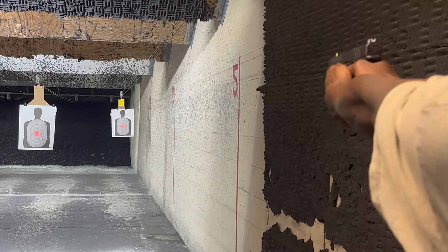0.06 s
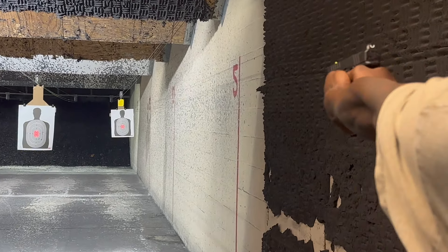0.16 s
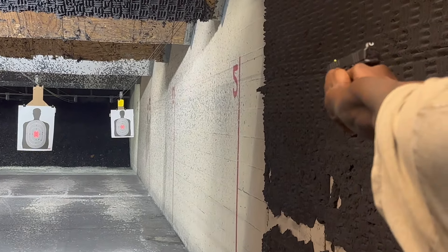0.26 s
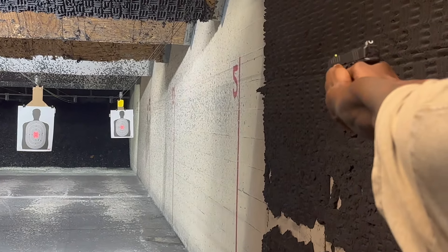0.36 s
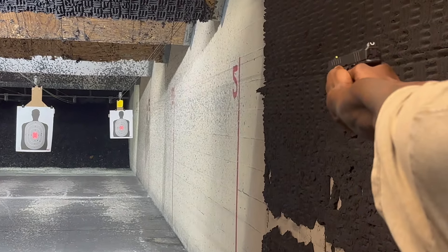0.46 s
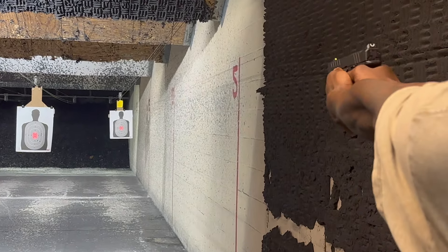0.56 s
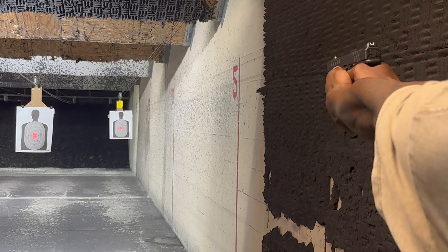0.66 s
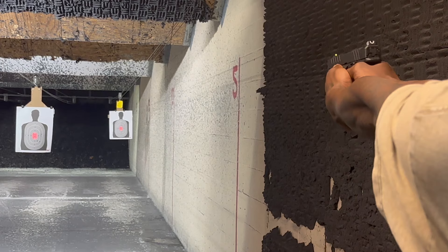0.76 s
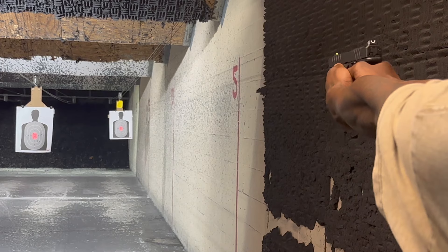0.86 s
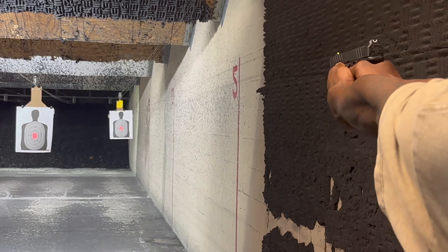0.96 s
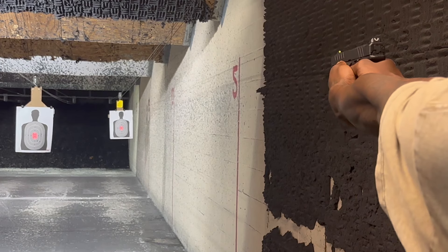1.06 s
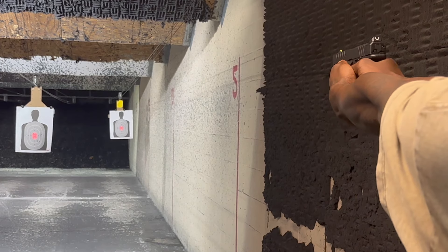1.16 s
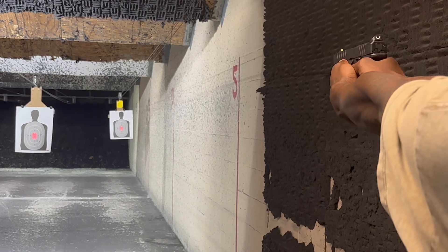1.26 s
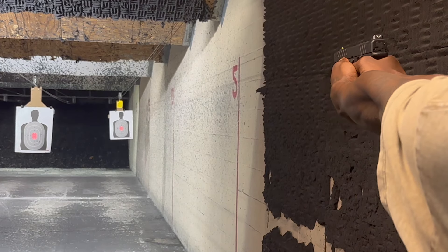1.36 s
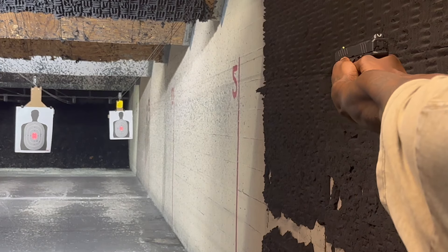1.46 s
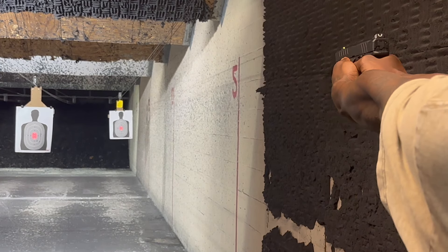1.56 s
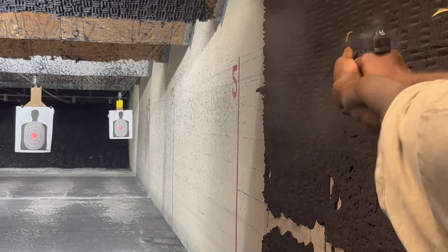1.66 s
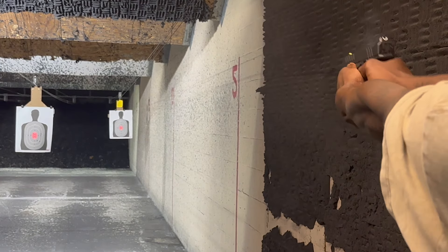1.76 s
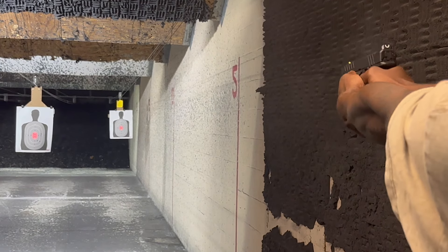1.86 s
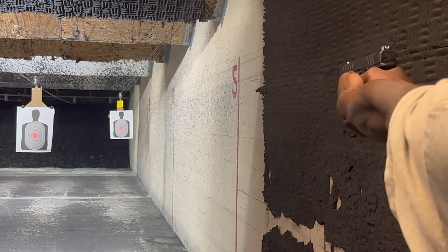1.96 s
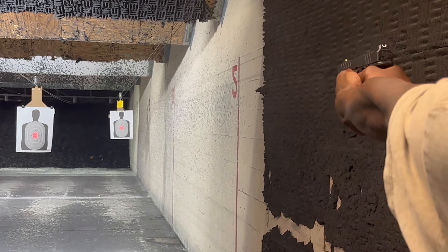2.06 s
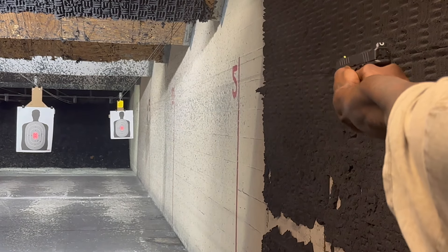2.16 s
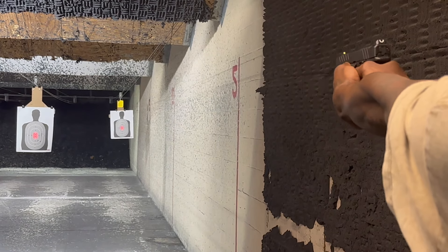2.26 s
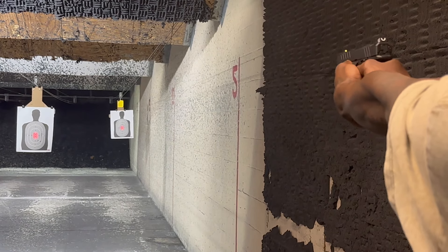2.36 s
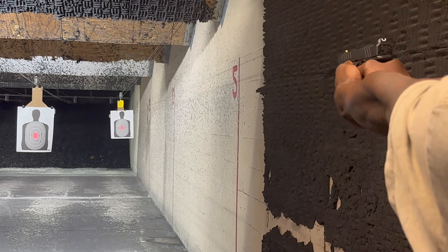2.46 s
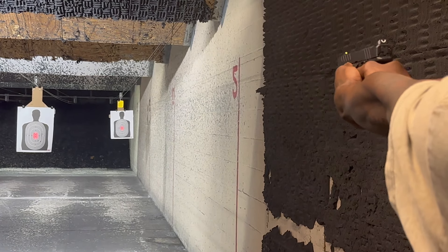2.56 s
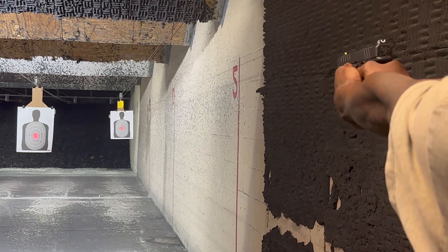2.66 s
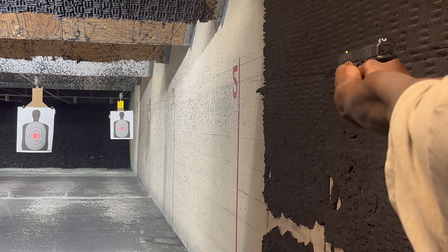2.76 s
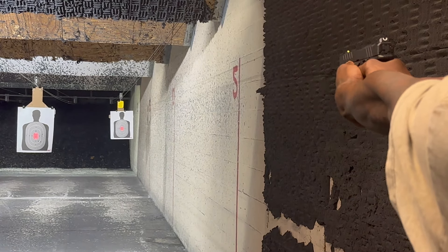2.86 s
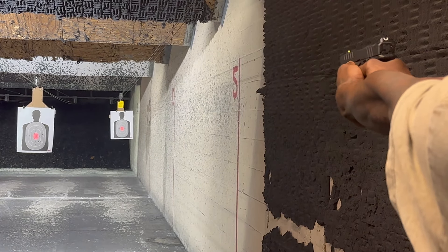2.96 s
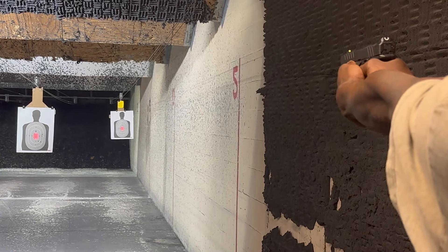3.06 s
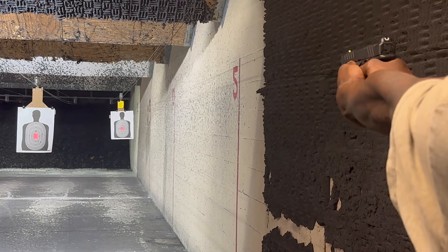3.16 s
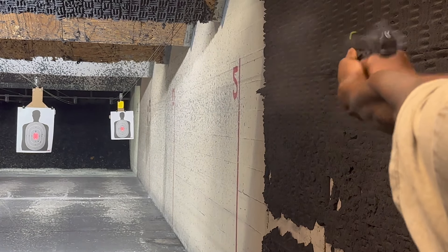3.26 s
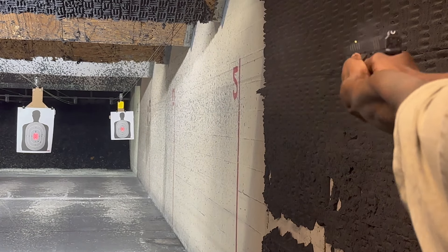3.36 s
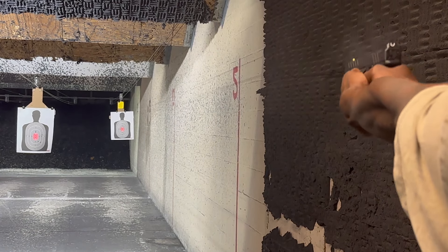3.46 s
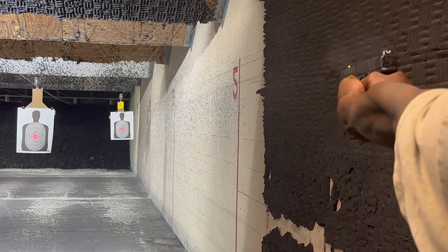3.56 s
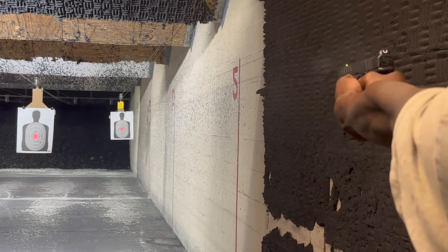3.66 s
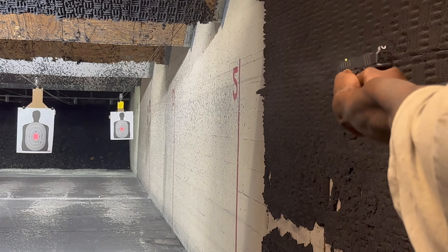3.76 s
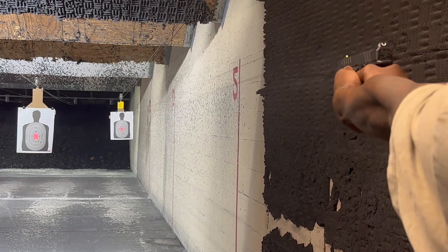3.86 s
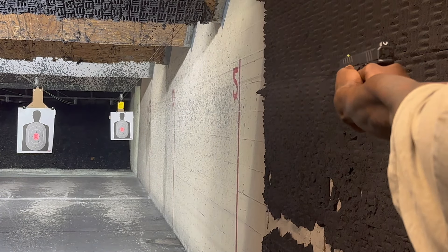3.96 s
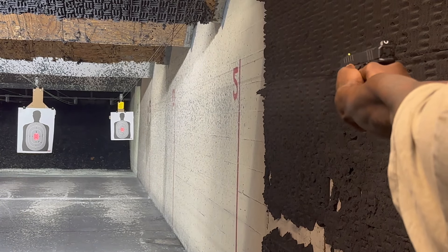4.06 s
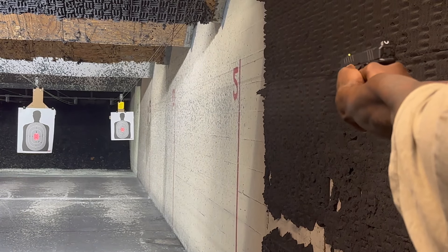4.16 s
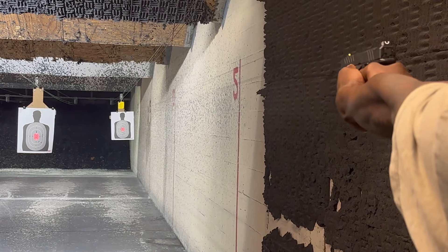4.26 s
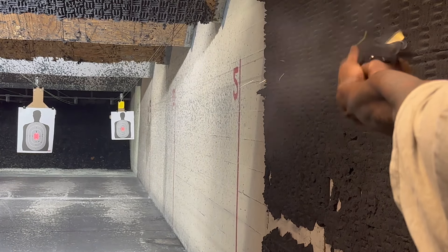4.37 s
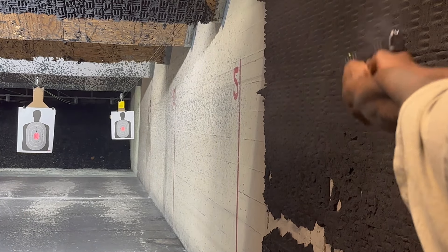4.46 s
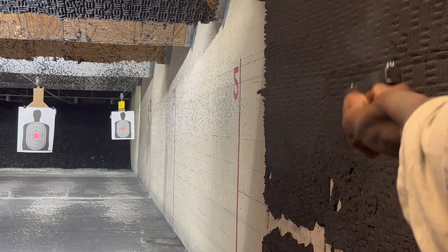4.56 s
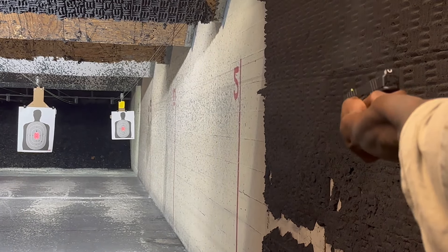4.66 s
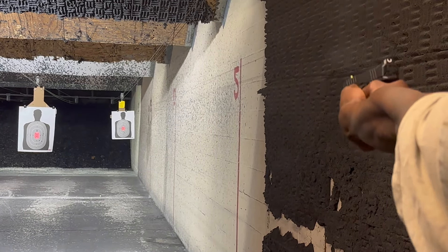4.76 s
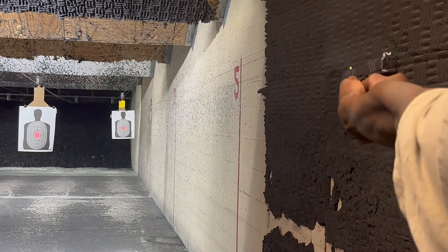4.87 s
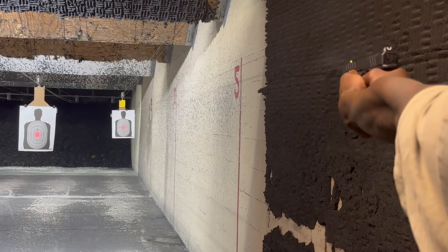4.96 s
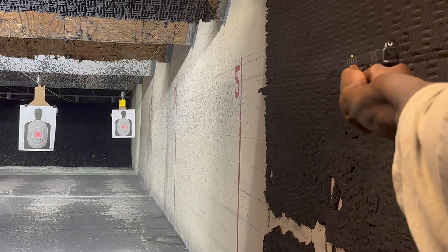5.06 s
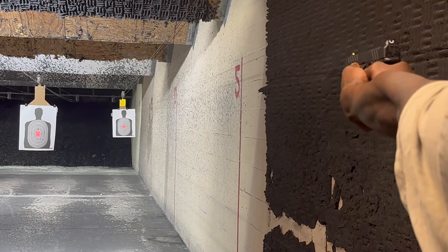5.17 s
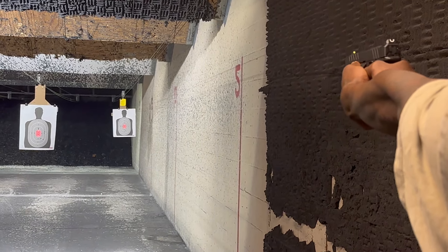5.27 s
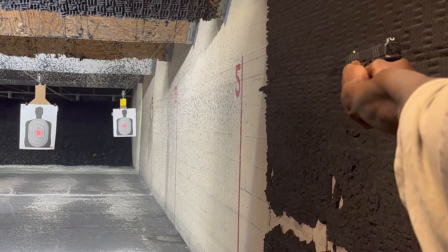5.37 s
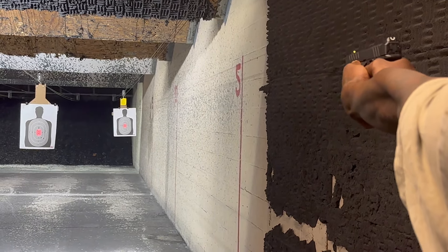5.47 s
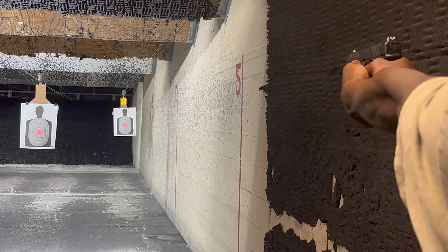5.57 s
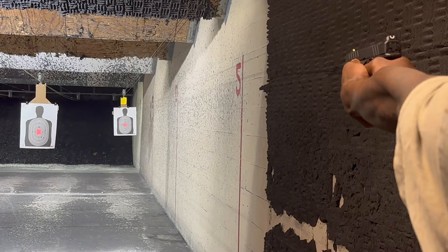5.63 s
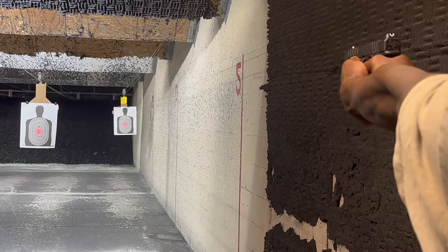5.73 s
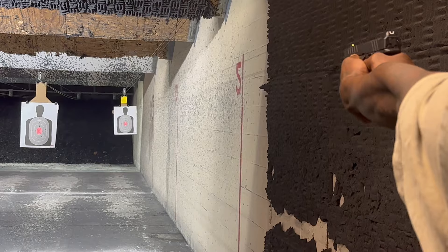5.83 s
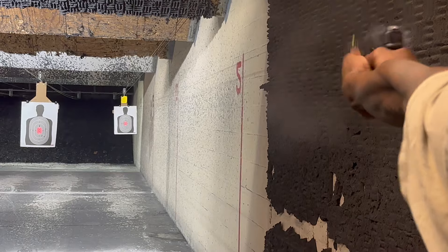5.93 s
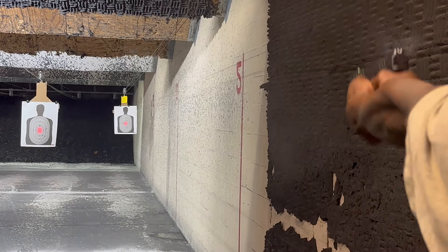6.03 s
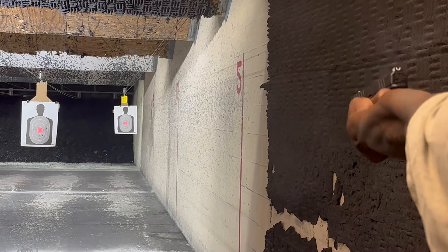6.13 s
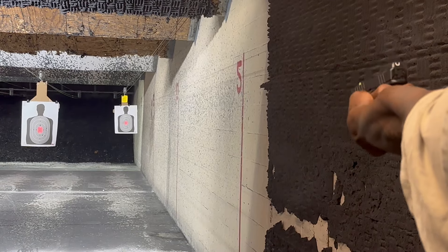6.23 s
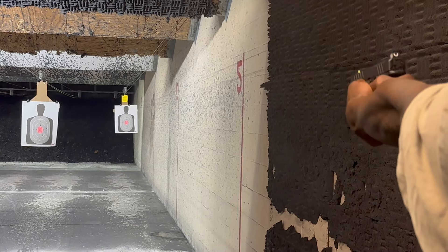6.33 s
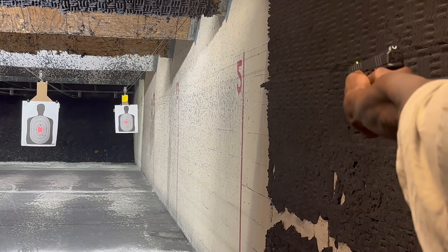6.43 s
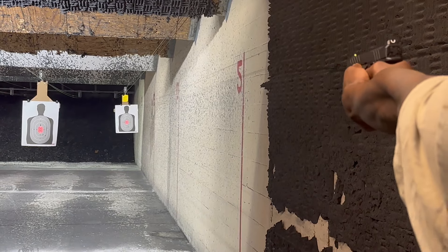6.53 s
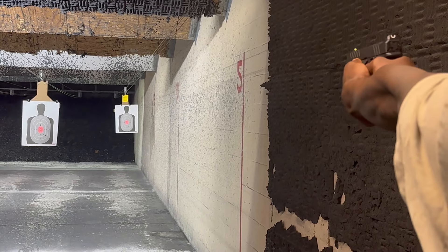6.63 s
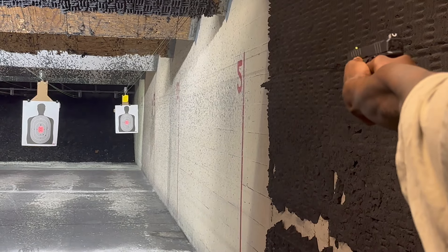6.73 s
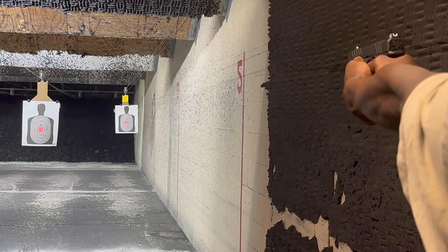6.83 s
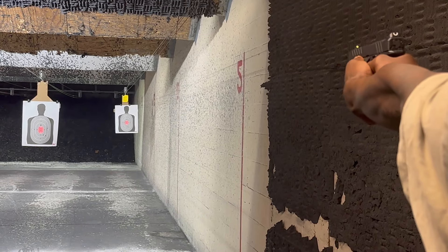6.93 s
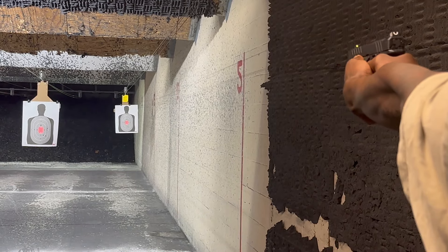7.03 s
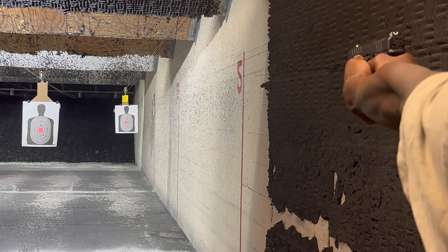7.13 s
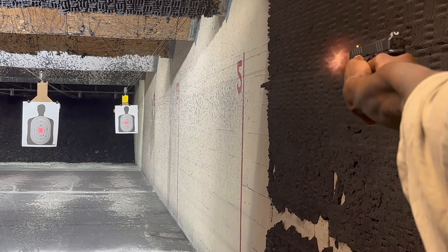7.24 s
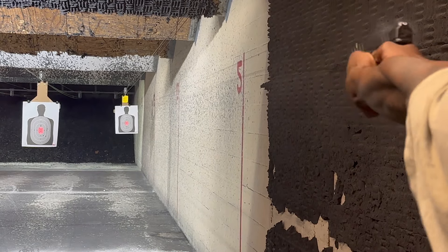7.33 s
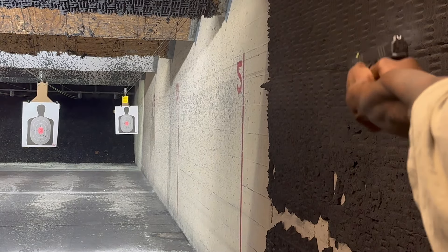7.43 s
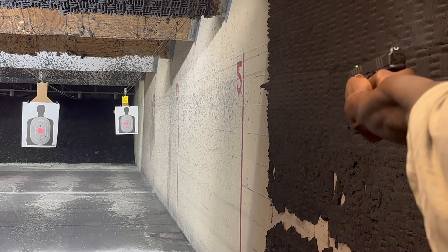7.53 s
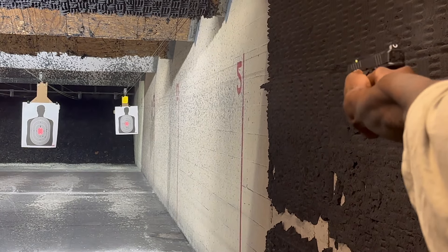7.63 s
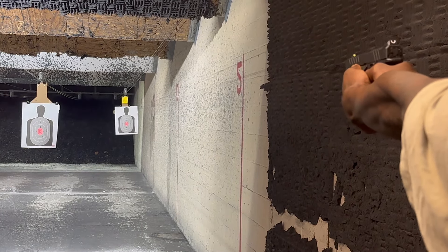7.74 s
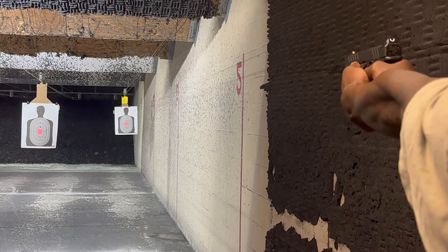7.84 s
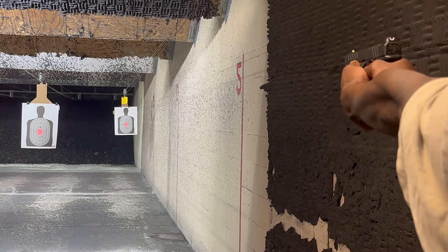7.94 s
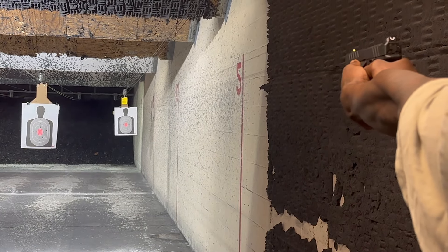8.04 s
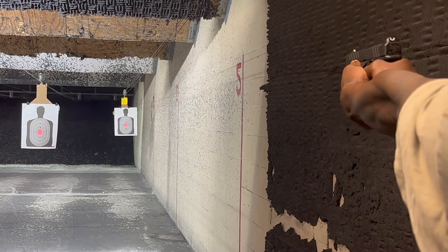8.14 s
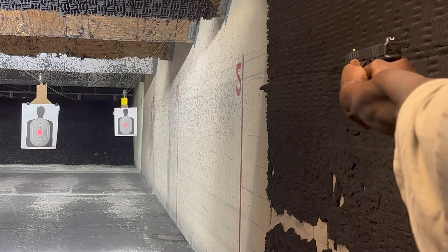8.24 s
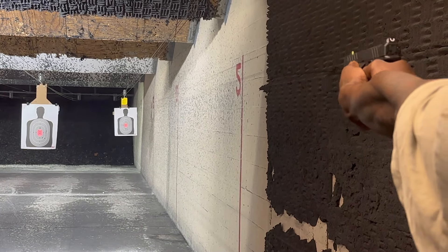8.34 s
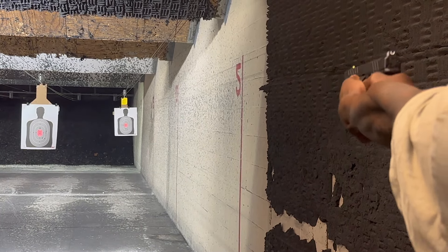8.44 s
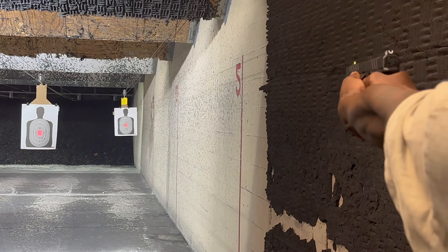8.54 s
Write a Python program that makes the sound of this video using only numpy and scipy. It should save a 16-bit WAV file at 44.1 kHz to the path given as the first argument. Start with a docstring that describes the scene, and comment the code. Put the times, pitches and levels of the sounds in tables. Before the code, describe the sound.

Three pistols fire by turns in a long concrete shooting hall. A fading tail opens, then softer far-lane shots alternate with hard, close blasts and strong shots from another lane. Dense echoes bounce off the walls for about a second. Sharp metal clacks follow near shots, ejected brass tinkles faintly on the floor, and ventilation rumbles low. A close stereo microphone pair flattens the peaks.

```python
"""Pistols in a shooting hall

Three pistols are fired in turns in a long concrete hall: one held next to the microphones, two in other lanes.
Each blast is shaped noise for the dense echoes plus booth tones that swell and fade; a limiter flattens the peaks.
Hard metallic clacks, short ticks and tones, come shortly after near shots, from the slide or a case; brass cases
tinkle on the floor as ringing modes. The ventilation rumbles as low filtered noise throughout, with the tail of
an earlier shot at the start."""
import sys
import numpy as np
from scipy import signal
from scipy.fft import rfft, irfft, next_fast_len
from scipy.io import wavfile
from scipy.ndimage import uniform_filter1d

SR = 44100
rng = np.random.default_rng(int(sys.argv[2]) if len(sys.argv) > 2 else 0)


def digitize_waveform(pressure):
    """Quantize a signal to 16-bit integers and store it at the path in sys.argv[1].

    Rows of a 2-D input are taken as channels; values are limited to [-1, 1].
    """
    field = np.atleast_2d(pressure).T
    bounded = np.clip(field, -1, 1)
    quanta = np.round(bounded * 32767).astype(np.int16)
    wavfile.write(sys.argv[1], SR, quanta)


N = 379260


def gain_of(db):
    """Amplitude factor for a level in dB."""
    return 10 ** (np.asarray(db) / 20)


def evened(x):
    """Scale a signal to an RMS of one."""
    return x / np.sqrt(np.mean(x ** 2) + 1e-20)


def read(points, hz):
    """Read a curve of (Hz, value) points, straight between them on a logarithmic pitch axis."""
    f, value = np.transpose(points)
    return np.interp(np.log(hz + 1), np.log(f + 1), value)


def add(mix, start_s, sound):
    """Lay a stereo sound into the mix; one begun before the start enters with its tail."""
    start = round(start_s * SR)
    sound = sound[:, max(-start, 0):]
    part = mix[:, max(start, 0):][:, :sound.shape[1]]
    part += sound[:, :part.shape[1]]


# Spectrum of the moving air, evened out before its level is set. Each row: pitch in Hz, relative level in dB.
AIR = [(15, -29.5), (30, -10.5), (55, -0.5), (95, -2), (130, -7), (170, -12), (300, -17), (550, -23),
       (950, -20.5), (1850, -27), (2300, -35.5), (4500, -50.5), (9000, -60), (16000, -77)]


def ventilation():
    """Air noise as a low, lumpy rumble over a faint hiss, its level drifting slowly at random."""
    level_db, drift_db = -60.5, 1.9
    hz = np.fft.rfftfreq(N, 1 / SR)
    white = rng.standard_normal((2, N))
    air = irfft(rfft(white) * gain_of(read(AIR, hz)), N)
    drift = uniform_filter1d(rng.standard_normal(N), 2000)
    lumps = evened(uniform_filter1d(drift, 2000))
    return gain_of(level_db + drift_db * lumps) * evened(air)


def reflections(size, uneven_db=2.5):
    """Two unrelated dense trains of echoes of random sign; the early ones vary in strength in clumps of a few ms."""
    clumps = evened(uniform_filter1d(rng.standard_normal(size), 180))
    early = np.exp(-np.arange(size) / (.15 * SR))  # late echoes are too many to tell apart
    return rng.standard_normal((2, size)) * gain_of(uneven_db * clumps * early)


# Colour of each blast as it arrives. Each row: pitch in Hz, relative level in dB.
NEAR_COLOUR = [(30, -26), (60, -4.5), (130, -0.5), (220, 4), (700, 4), (1200, 1.5), (1900, -3.5),
               (2300, -11.5), (3500, -16.5), (5500, -19), (10000, -24.5), (16000, -20)]
NEXT_LANE_COLOUR = [(30, -27), (60, -0.5), (130, 0.5), (250, 5), (700, 5.5), (1200, 1), (1900, -4),
                    (2300, -10.5), (3500, -17), (5500, -20), (10000, -26.5), (16000, -24.5)]
FAR_LANE_COLOUR = [(30, -29), (60, -4), (130, -1), (300, 1.5), (700, 2.5), (1200, 1), (1900, -3.5),
                   (2300, -12), (3500, -18), (5500, -21), (10000, -27.5), (16000, -31)]
# Resonances of each booth, swelling and fading as echoes pile up.
# Each row: pitch in Hz, level in dB before the lane's ring level, centre of the swell in seconds.
NEAR_BOOTH = [(65, -12, .04), (115.7, -16, .19), (212, -1, .035), (262.7, -7, .055), (351.7, -1.5, .0052),
              (478.8, -5, .02), (609.4, -6, .026), (785, -1, .014), (941.5, -7, .018), (1358, -5, .031),
              (1617, -2, .042)]
NEXT_LANE_BOOTH = [(69.5, -11, .066), (225, -1, .0099), (265.7, -6, .05), (440, -5.5, .067),
                   (492.6, -6, .029), (580, .5, .0087), (656, -7, .071), (834, 2.5, .0033),
                   (1360, -.5, .0097), (1890, -4.5, .022)]
FAR_LANE_BOOTH = [(124, -15.5, .15), (327.7, .5, .035), (495, -10.5, .035), (595, -9.5, .077),
                  (735, -15, .042), (813, -2, .023), (933, -9.5, .037), (1038, -7.5, .04), (1460, 0, .009),
                  (1658, 4.5, .0046), (1834, -12, .0077)]
# Strong returns from the walls of the hall.
# Each row: delay in seconds, level in dB relative to the other echoes, decay time constant in seconds.
NEAR_RETURNS = [(0.05, -3.5, .006), (0.073, -1, 0.0095), (.13, -7, .008)]
NEXT_LANE_RETURNS = [(0.034, 1.8, 0.014), (.074, 3, .008)]
FAR_LANE_RETURNS = [(.028, 2, .006), (.053, 3, .008), (.105, 1, .008)]
# Decay of the hall, band by band. Each row: band centre in Hz, time to fall 60 dB in seconds,
# level of the first echoes over the tail in dB before the lane's own offset.
HALL = [(50, 1.5, -4.5), (110, 1.15, -4), (250, .91, .5), (550, 1.02, -3), (1130, 1.184, 3),
        (1700, 1.18, 6.5), (2400, 1.18, 12.5), (5150, .96, 14.5), (8400, .81, 17), (13500, .47, 12)]
# Every shot; the first is fired before the start and still ringing. Each row: start in seconds, lane,
# level in dB, treble shelf in dB, bass shelf in dB (the shelves tilt the echoes before they are levelled).
SHOTS = [(-.79, "far", -16.5, 0, 0), (.2355, "far", -17.5, 0, -1.5), (1.1235, "far", -16.5, 0, -1.5),
         (1.601, "near", -10.5, -3, .6), (2.469, "far", -17, 0, 0), (2.832, "next", -9.5, 0, 0),
         (3.203, "near", -10, -2.5, -.8), (3.333, "far", -18.5, 0, 0), (4.346, "near", -10.5, .4, 3),
         (5.859, "near", -8, -5, -5), (7.237, "near", -13, -4, -.8), (8.262, "next", -10, 0, 0)]


def booth_ring(t, booth, rise_s):
    """Booth resonances: each tone swells and fades around its own moment, lower ones always a little longer."""
    swell_s, swell_slope = .023, -.15  # full width to 1/e at 500 Hz; power of pitch that scales it
    turns = rng.random((len(booth), 1))
    ring = 0
    for (f, db, peak_s), turn in zip(booth, turns):
        width_s = swell_s * (f / 500) ** swell_slope
        swell = np.exp(-(2 * (t - peak_s) / width_s) ** 2)
        ring = ring + gain_of(db) * swell * np.sin(2 * np.pi * (f * t + turn))
    return ring * (1 - np.exp(-t / rise_s)) ** 2


def hall_fades(t, returns, rise_s, first_db, first_long):
    """Hall decay per band: a build-up, quickly dying first echoes over a longer tail, and bumps for the walls."""
    bass_slower, bass_hz = 4.2, 400  # the deepest bass adds this many rise times to its build-up
    first_bass_s, first_treble_s, treble_hz = .32, .135, 2100  # 60 dB falls before first_long scales them
    bumps = 1 + sum(gain_of(db) * np.exp(-(t - s) / long_s) * (t > s) for s, db, long_s in returns)
    fades = []
    for f, t60, band_db in HALL:
        band_rise_s = rise_s * (1 + bass_slower / (1 + (f / bass_hz) ** 3))
        rise = (1 - np.exp(-t / band_rise_s)) ** 2
        first_t60 = first_treble_s + (first_bass_s - first_treble_s) / (1 + (f / treble_hz) ** 4)
        tail = gain_of(-60 * t / t60)
        first = gain_of(first_db + band_db - 60 * t / (first_long * first_t60))
        fades.append(rise * (tail + first) * bumps)
    return fades


def pistol(lane, colour, booth, returns, rise_s, alike, first_db, first_long, ring_db):
    """One lane keeps one pattern of echoes for all its shots; moving air and hands change a share of it."""
    size = next_fast_len(round(1.4 * SR))  # each shot rings for at least 1.4 s
    t, hz = np.arange(size) / SR, np.fft.rfftfreq(size, 1 / SR)
    centres = np.log(np.array(HALL)[:, 0])
    # overlapping triangular bands that add up to one
    bands = [np.interp(np.log(hz + 1), centres, one) for one in np.eye(len(HALL))]
    ring = booth_ring(t, booth, rise_s)
    fades = hall_fades(t, returns, rise_s, first_db, first_long)
    pattern = reflections(size)
    out = np.zeros((2, N))
    for start_s, shot_lane, db, treble_db, bass_db in SHOTS:
        if shot_lane != lane:
            continue
        echoes = alike * pattern + np.sqrt(1 - alike ** 2) * reflections(size)
        tilt_db = treble_db * hz / (hz + 3000) + bass_db / (1 + (hz / 180) ** 2)
        spectrum = rfft(echoes) * gain_of(read(colour, hz) + tilt_db)
        blast = sum(fade * irfft(spectrum * band, size) for fade, band in zip(fades, bands))
        blast = blast / np.std(blast[:, :SR // 10])  # levelled over its first tenth of a second
        add(out, start_s, gain_of(db) * (blast + gain_of(ring_db) * ring))
    return out


# Hard metallic clacks shortly after near shots, from the slide or a case.
# Each row: time of the peak in seconds, level in dB before the layers are summed, pitch of the tone in Hz.
CLACKS = [(1.6775, -20.5, 3630), (3.2807, -11.5, 3840), (4.3953, -18, 3860), (4.4225, -13, 3667),
          (4.4787, -28.5, 3800), (7.3158, -21, 3710)]


def clacks():
    """Metal struck hard: a few cycles at one pitch, a wide tick of noise and a duller knock below."""
    out, t = np.zeros((2, N)), np.arange(-SR // 200, SR // 50) / SR
    shape = np.exp(-(t / .0017) ** 2) + .12 * np.exp(-t / .004) * (t > 0)
    for peak_s, db, hz in CLACKS:
        tick = rng.standard_normal((2, len(t)))
        knock = np.sin(2 * np.pi * (1250 * t + rng.random()))
        tone = np.sin(2 * np.pi * hz * t) * np.exp(-(t / .001) ** 2)
        clack = tone + gain_of(-4) * tick + gain_of(-0.5) * knock
        add(out, peak_s + t[0], gain_of(db) * shape * clack)
    return out


# Cases striking the floor. Each row: start in seconds, level in dB before the layers are summed,
# pitch of the tick in Hz, level of the ring in dB relative to that level.
CASES = [(2.3453, -58.5, 9180, -1), (5.4388, -55.5, 4840, -10), (5.748, -66, 9000, -6),
         (5.7623, -68, 9000, 5), (6.6855, -56, 9090, 4), (6.811, -44.5, 1900, -22),
         (6.8907, -63.5, 6920, -1.2), (8.0486, -49, 12000, -6.5)]
# Modes of the brass tube. Each row: pitch in Hz, relative level in dB, time to fall 60 dB in seconds.
BRASS = [(8600, -18, .04), (10870, 0, .25), (13300, -16, .04), (14600, -16, .08), (15300, -10, .06)]


def cases():
    """A short tick, bright or dull by how the case lands, then the spinning brass tube rings unevenly."""
    out, t = np.zeros((2, N)), np.arange(SR // 3) / SR
    # the blow and its scatter in the booth
    blow = gain_of(-60 * t / .022)
    scatter = gain_of(-16 - 60 * t / .1)
    shape = (blow + scatter) * (1 - np.exp(-t / .0007))
    for start_s, db, hz, ring_db in CASES:
        noise = rng.standard_normal((2, len(t)))
        b, a = signal.butter(1, [.87 * hz, 1.15 * hz], "band", fs=SR)
        tick = evened(signal.lfilter(b, a, noise))
        strike = (gain_of(-5.5) * tick + gain_of(-15) * noise) * shape
        ring = 0
        for f, mode_db, t60 in BRASS:
            wobble = evened(uniform_filter1d(rng.standard_normal((2, len(t))), 250))
            mode = gain_of(mode_db - 60 * t / t60) * np.sin(2 * np.pi * f * t)
            ring = ring + mode * (.5 + wobble)
        add(out, start_s, gain_of(db) * (strike + gain_of(ring_db) * ring))
    return out


def scene():
    """All sources in two channels: their noises are unrelated between the channels, their steady tones shared."""
    air = ventilation()
    far_lane = pistol("far", FAR_LANE_COLOUR, FAR_LANE_BOOTH, FAR_LANE_RETURNS,
                      rise_s=.0058, alike=0.97, first_db=-4.0, first_long=0.61, ring_db=2.1)
    near = pistol("near", NEAR_COLOUR, NEAR_BOOTH, NEAR_RETURNS,
                  rise_s=.0011, alike=0.86, first_db=4.5, first_long=1.05, ring_db=-.6)
    next_lane = pistol("next", NEXT_LANE_COLOUR, NEXT_LANE_BOOTH, NEXT_LANE_RETURNS,
                       rise_s=0.0012, alike=.9, first_db=3.0, first_long=0.86, ring_db=-1.1)
    return air + far_lane + near + next_lane + clacks() + cases()


# The microphone pair. Each row: pitch in Hz, likeness of the channels (-1 to 1) before the port blur,
# left minus right in dB.
PAIR = [(30, .93, .8), (150, .92, 1), (450, .56, 2.3), (1000, .2, -1.1), (1500, -.4, -4), (1800, -.35, -5),
        (2400, .7, -.8), (3200, .86, .3), (4500, 1.01, 0)]
# The right port turns against the left across these bands, and the turns add up.
# Each row: lower edge in Hz, upper edge in Hz, turn in half turns.
PORT_TURNS = [(2300, 3000, -.17), (3600, 4800, .17), (6600, 8300, -2), (8700, 10950, 1), (11900, 13900, 1)]


def microphones(dry):
    """The pair shares part of the field, with a phase between the ports that turns across the treble."""
    port_blur = .3  # likeness lost where the ports are a quarter turn apart
    size = next_fast_len(N + 4096)
    hz = np.fft.rfftfreq(size, 1 / SR)
    f, likeness, lean = np.transpose(PAIR)
    same = read(np.transpose([f, likeness]), hz)
    lean_db = read(np.transpose([f, lean]), hz)
    lead = np.pi * sum(turns * np.clip((hz - lo) / (hi - lo), 0, 1) for lo, hi, turns in PORT_TURNS)
    same = np.clip(same - port_blur * np.sin(lead) ** 2, -1, 1)
    a, b = rfft(dry, size)
    right = (same * a + np.sqrt(1 - same ** 2) * b) * np.exp(1j * lead)
    spectra = np.array([a * gain_of(lean_db / 2), right * gain_of(-lean_db / 2)])
    return irfft(spectra, size)[:, :N]


def limiter(pair):
    """Both channels are turned down together by a share of their overshoot, then clipped."""
    threshold_db, share = -15, .59
    power = abs(uniform_filter1d((pair ** 2).mean(0), 200))
    power_db = 10 * np.log10(power + 1e-12)
    fall = np.arange(N) * 150. / SR  # the tracked level falls by at most 150 dB a second
    tracked_db = np.maximum.accumulate(power_db + fall) - fall
    over_db = np.maximum(tracked_db - threshold_db, 0)
    return np.clip(pair / gain_of(share * uniform_filter1d(over_db, 100)), -.97, .97)


def record(dry):
    """Microphone pair, limiter and clip, then a steep low-pass at 16050 Hz."""
    held = limiter(microphones(dry))
    low_pass = signal.firwin(511, 16050, window=("kaiser", 9), fs=SR)
    return signal.oaconvolve(held, low_pass[None], "same")


dry = scene()
out = record(dry)
digitize_waveform(out)
```